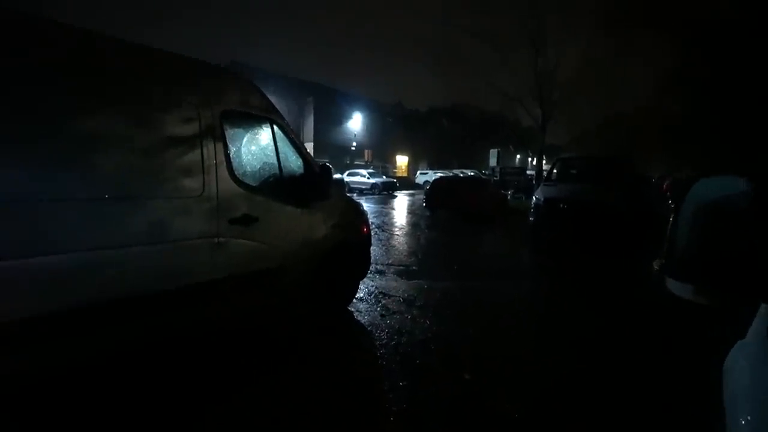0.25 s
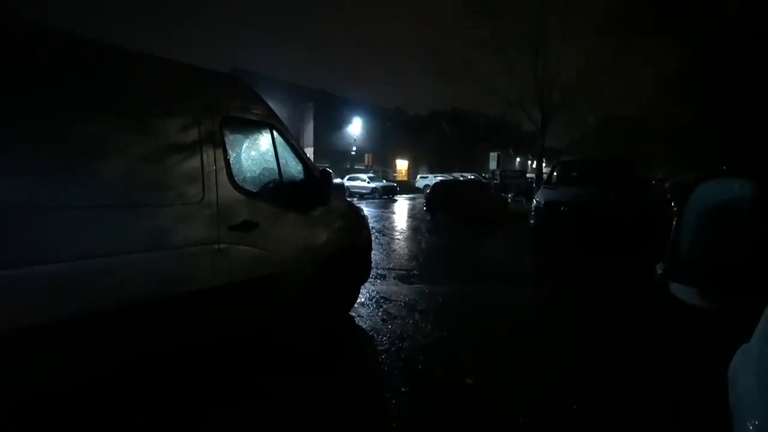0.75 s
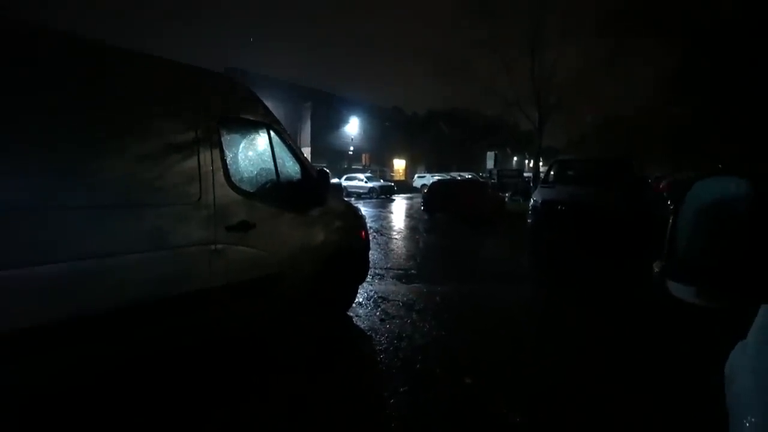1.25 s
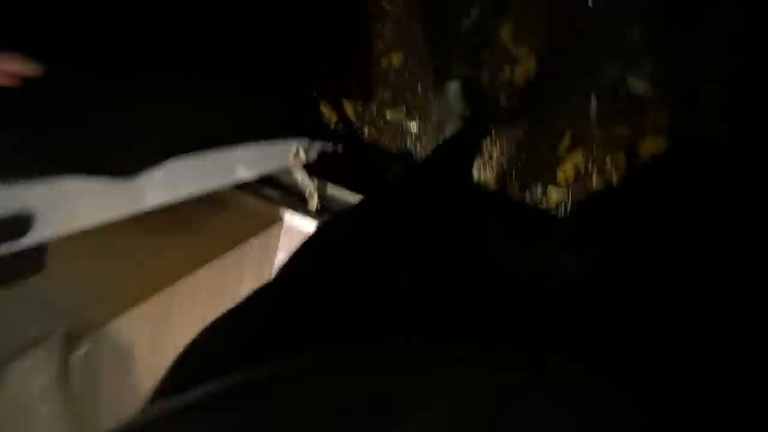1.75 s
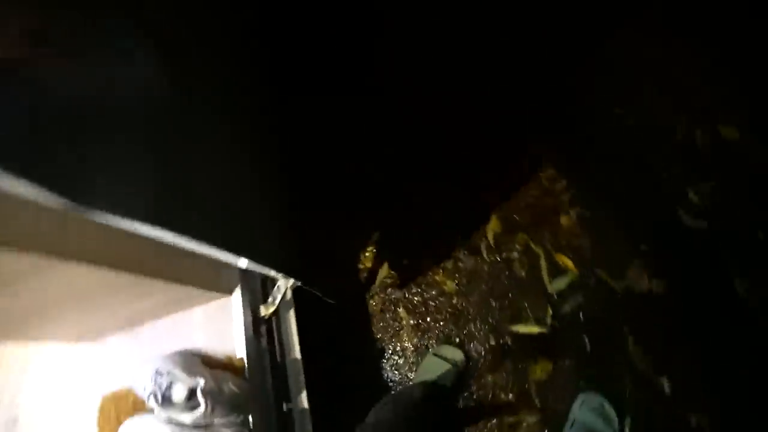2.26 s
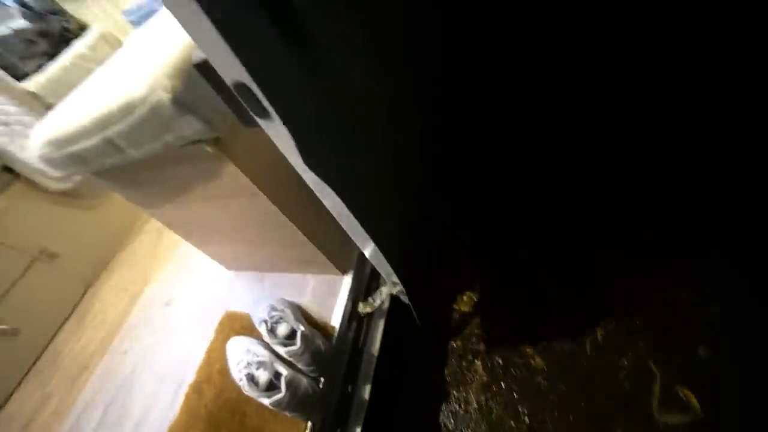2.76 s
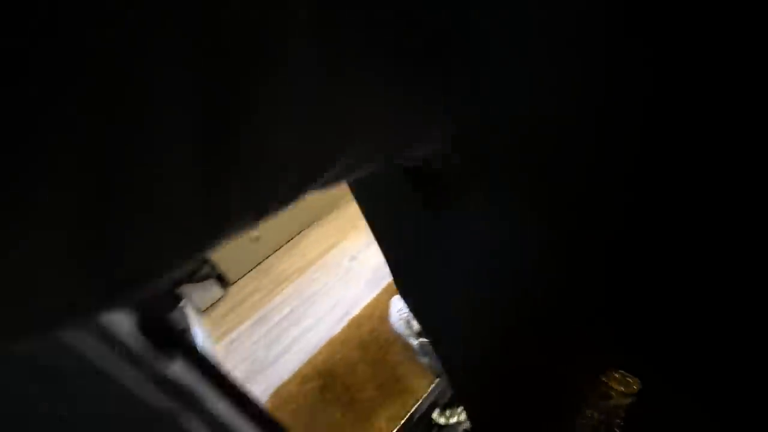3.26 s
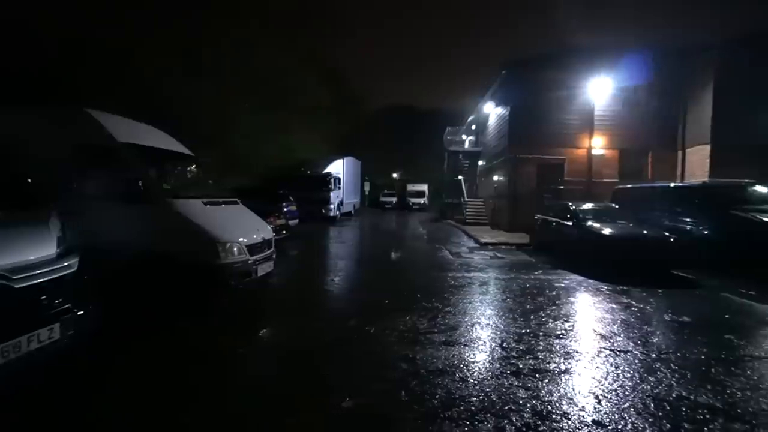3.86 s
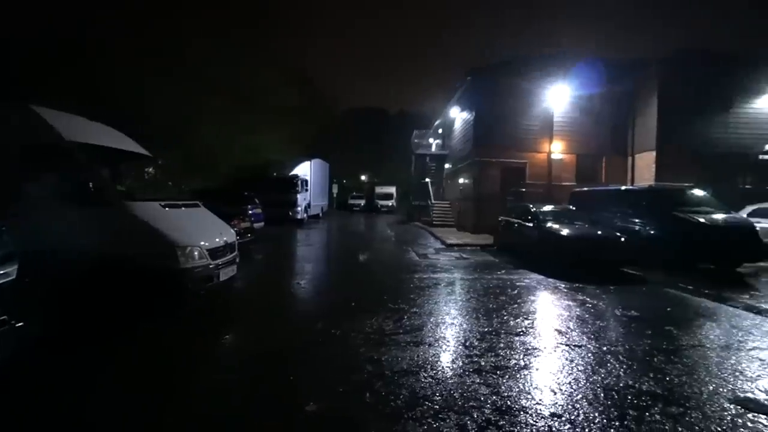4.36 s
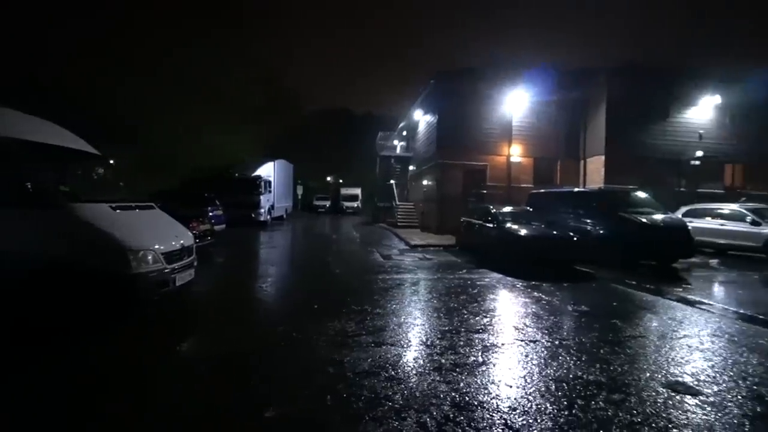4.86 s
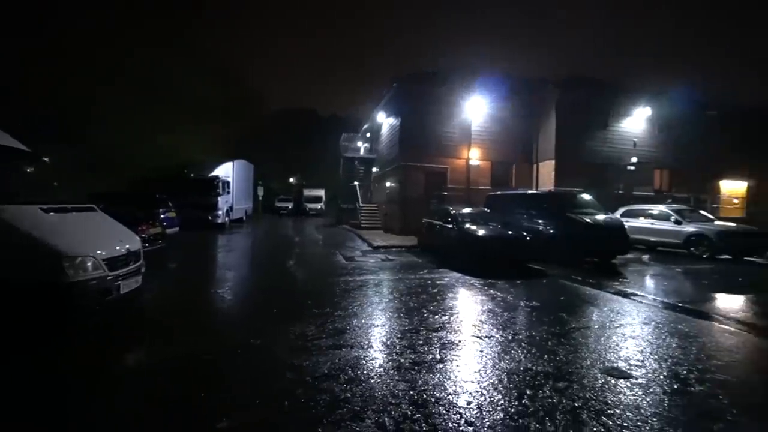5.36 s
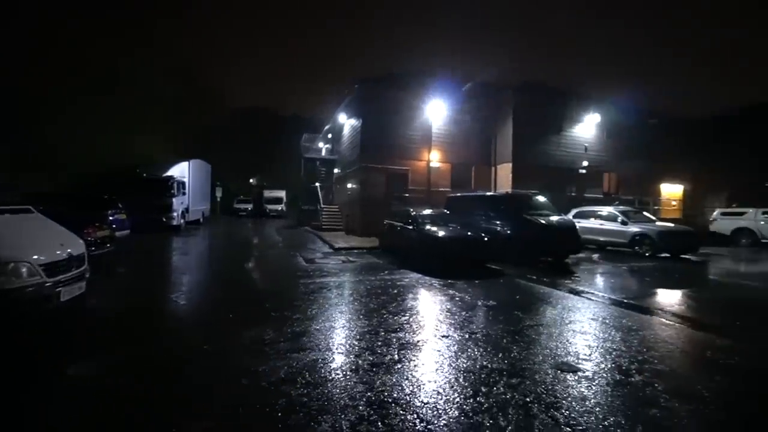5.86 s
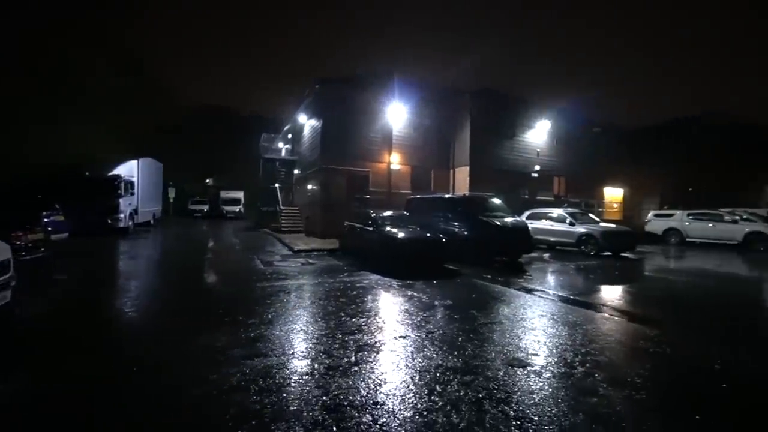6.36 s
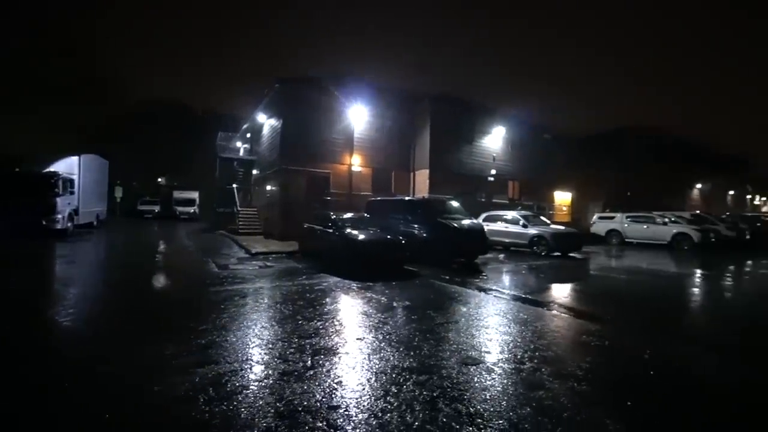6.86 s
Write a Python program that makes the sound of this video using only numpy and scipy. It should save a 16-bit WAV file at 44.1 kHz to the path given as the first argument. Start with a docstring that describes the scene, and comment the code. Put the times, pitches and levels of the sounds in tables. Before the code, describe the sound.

Steady rain in a car park, with sharp clacks, jacket rustle and a van's sliding door rolling shut with a boom.

```python
"""Heavy rain on a car park

Rain drums on parked vans and splashes on tarmac, heard from a hand-held camera. The sound fades out
briefly; someone steps down from a van, scuffs against it and rolls its sliding door shut.
Stray drops tick and thump on the camera; slow air pressure sways on the microphone."""
import sys
import numpy as np
from scipy import signal
from scipy.fft import rfft, irfft, next_fast_len
from scipy.io import wavfile
from scipy.ndimage import uniform_filter1d, map_coordinates

SR = 44100
rng = np.random.default_rng(int(sys.argv[2]) if len(sys.argv) > 2 else 0)


def waveform_to_disk(signal):
    """Save audio, clipped to [-1, 1], as 16-bit WAV at the path in sys.argv[1]."""
    frames = np.transpose(np.atleast_2d(signal))
    scaled = np.clip(frames, -1, 1) * 32767
    samples = np.round(scaled).astype(np.int16)
    wavfile.write(sys.argv[1], SR, samples)


N = 313992


def amp(db):
    """Decibels to gain."""
    return 10 ** (np.asarray(db) / 20)


def unit(x):
    """Scale to rms 1."""
    return x / np.sqrt(np.mean(x ** 2) + 1e-20)


def clock():
    """Seconds at each sample."""
    return np.arange(N) / SR


def envelope(shape, t):
    """Trapezoid, 0 to 1; shape is (start, attack, hold, release) in s."""
    return np.interp(t, np.cumsum(shape), [0, 1, 1, 0])


def wobble(rate):
    """A smooth random curve, rate knots a second."""
    return map_coordinates(rng.standard_normal(int(N * rate / SR) + 4), [clock() * rate])


def filtered(x, response):
    """x times a response of frequency."""
    m = next_fast_len(N + SR // 2)
    return irfft(rfft(x, m) * response(np.fft.rfftfreq(m, 1 / SR)), m)[:N]


def coloured(x, points):
    """x shaped by (Hz, dB) points on a log axis."""
    f, db = np.transpose(points)
    return filtered(x, lambda hz: amp(np.interp(np.log(hz + 1), np.log(f + 1), db)))


def noise(points):
    """Coloured noise of rms 1."""
    return unit(coloured(rng.standard_normal(N), points))


def patter(points, rate, spread_db):
    """Random tiny impacts, rate a second, of scattered sizes; rms 1."""
    sizes = amp(spread_db * rng.standard_normal(N)) * rng.standard_normal(N)
    return unit(coloured(sizes * (rng.random(N) < rate / SR), points))


def patchy(x, depth_db):
    """Let patches of the spectrum swell and sink."""
    z = signal.stft(x, nperseg=1024)[2]
    field = uniform_filter1d(rng.standard_normal(z.shape), size=6, axis=0)
    field = uniform_filter1d(field, size=8, axis=1)
    return unit(signal.istft(z * amp(depth_db * unit(field)), nperseg=1024)[1][:N])


def ring(modes, t):
    """Damped modes, struck at slightly new strengths."""
    scatter = rng.standard_normal(len(modes))
    return sum(amp(db + d) * np.exp(-np.log(1000) * t / t60) * np.sin(2 * np.pi * hz * t)
               for (hz, db, t60), d in zip(modes, scatter))


def add(track, s, sound):
    """Mix a sound in at time s."""
    start = max(round(s * SR), 0)
    track[start:start + len(sound)] += sound[:max(N - start, 0)]


def rain():
    """Dense drops drum on bodywork, splash on tarmac and throw up spray."""
    # impact spectra: f/Hz, level/dB
    bodywork_spectrum = [(40, 3), (100, -1), (220, -0.5), (400, -2.5), (700, -3), (1050, -3), (1600, -7),
                         (2600, -9.5), (6000, -51)]
    tarmac_spectrum = [(300, -29), (1000, -7.5), (1700, -2.5), (2400, -0.5), (3200, -.5), (4200, -6),
                       (5200, -10), (6500, -19), (9000, -35), (15000, -47)]
    spray_spectrum = [(2000, -40), (5000, -0.5), (7000, -1), (8000, 1), (10000, -8), (12500, -10.5),
                      (15500, -17)]
    # rain as heard; in the last row the gain slowly recovers after the slam:
    # start t/s, drumming/dB, splash/dB, spray/dB, level drift/(dB/s)
    stretches = [(0, -24.5, -24, -37, -0.78), (1.325, -32, -30.5, -47.5, -0.76),
                 (3.87, -33.5, -36.5, -53, 1.19)]
    t, rows = clock(), np.array(stretches)
    stretch = np.searchsorted(rows[1:, 0], t)
    start_s, drum_db, splash_db, spray_db, drift_db_per_s = rows[stretch].T
    near_van = stretch == 0
    swish_db = -7.5 * (t - 0.62) ** 2 * near_van  # swells, then sinks
    heard_level = amp(drift_db_per_s * (t - start_s) + 0.29 * wobble(5.5))
    drumming = patchy(patter(bodywork_spectrum, rate=14000, spread_db=2.5), depth_db=0.87)
    splash = patchy(patter(tarmac_spectrum, rate=30000, spread_db=1.5), depth_db=1.24)
    spray = patter(spray_spectrum, rate=32000, spread_db=3.5)
    hiss = amp(splash_db) * splash + amp(spray_db) * spray
    downpour = heard_level * (amp(drum_db) * drumming + amp(swish_db) * hiss)
    return np.where(near_van, beside_van(downpour), downpour)


def beside_van(x):
    """Rain near the van: a bright band, then a hollow-sounding one that sinks as the camera turns."""
    # colour near the van: f/Hz, gain/dB
    van_colour = [(60, 5.5), (150, -0.5), (380, -0.5), (600, -1), (1000, -1.5), (1400, -1.5), (1900, -0.5),
                  (2600, 0), (3400, 0.5), (5500, 2.2), (8000, 0), (15000, -1.5)]
    hz, t, z = signal.stft(coloured(x, van_colour), SR, nperseg=1024)

    def band(centre_hz, width_oct):
        return np.exp(-(np.log2((hz[:, None] + 1) / centre_hz) / width_oct) ** 2)

    hollow_hz = 1250 * 2 ** (-0.58 * t)
    hollow_db = 6.5 * envelope((0.1, 0.77, 0.17, 0.41), t) * band(hollow_hz, width_oct=0.56)
    bright_db = 2 * envelope((0, 0.15, 0.3, 0.22), t) * band(3250, width_oct=0.3)
    return signal.istft(z * amp(hollow_db + bright_db), SR, nperseg=1024)[1][:N]


def door():
    """Rollers rumble louder with speed; the door brakes, booms on its frame, shudders into the seal."""
    # roller and body spectra: f/Hz, level/dB
    roller_spectrum = [(60, -32), (130, -2), (200, 2.5), (290, -2), (410, -2.5), (650, -13), (1200, -21),
                       (2500, -28), (5000, -43), (12000, -76)]
    shudder_spectrum = [(15, -18), (38, 4.5), (70, 4), (130, -2.5), (200, -11.5), (500, -70)]
    # hits on the frame: t/s, level/dB
    slams = [(3.576, -7), (3.607, -13), (3.65, -14.5), (3.724, -17)]
    # door panel modes: f/Hz, level/dB, t60/s
    panel_modes = [(66, -12, 0.23), (118, -7, 0.12), (203, -20, 0.16), (340, -2.5, 0.041), (480, 6, 0.04),
                   (593, -3, 0.094), (677, -8, 0.12), (948, -6.5, 0.053), (1115, -10, 0.043)]
    pull_s, latch_s, rest_s, stop_s, brake_db_per_s = 2.763, 3.498, 3.88, 0.04, 60
    t = clock()
    speed = np.clip((t - pull_s) / (latch_s - pull_s), 0, 1)
    braking = amp(-brake_db_per_s * np.maximum(t - latch_s, 0))
    drive = speed ** 0.89 * braking * np.clip((rest_s - t) / stop_s, 0, 1)
    roll_db = -14.8 + 1.6 * wobble(22)  # rollers run unevenly
    rumble = patchy(patter(roller_spectrum, rate=9000, spread_db=2), depth_db=1.5)
    seating = amp(-15) * envelope((3.52, 0.099, 0.16, 0.091), t)
    shudder = (amp(-30) * drive + seating) * noise(shudder_spectrum)
    sound = amp(roll_db) * drive * rumble + shudder
    age_s = np.arange(SR // 3) / SR
    for s, db in slams:
        add(sound, s, amp(db) * ring(panel_modes, age_s))
    return sound


def knocks(crack_decay_s=0.0022):
    """Step, handle, runners and latch: each hard contact cracks and rings briefly."""
    # contacts: t/s, crack/dB, ring/dB, ring f/Hz
    contacts = [(1.777, -25, -17, 3660), (1.866, -3.5, -1.5, 636), (1.915, -22, -13, 2970),
                (1.978, -10.5, -10, 2430), (2.035, -16, -11, 1850), (2.824, -22, -11.5, 2380),
                (2.877, -33, -8.5, 1140), (2.978, -31, -10.5, 1130), (3.001, -3.5, -1, 1310),
                (3.251, -13, -11, 2820), (3.575, -6.5, -13, 3180), (3.644, -14, -16, 1930),
                (3.725, -17, -7, 690)]
    # modes of small steel parts: ratio to ring f, level/dB, t60/s
    steel_modes = [(.8, -18, .008), (1, 1.5, .012), (1.3, -25, 0.01), (1.85, -18, .007)]
    # crack colour: f/Hz, gain/dB
    crack_colour = [(150, -22), (900, 7), (2500, 4.5), (4500, 0.5), (6500, -10), (9500, -20), (12800, -14),
                    (15500, -28)]
    cracks, rings = np.zeros(N), np.zeros(N)
    t = np.arange(SR // 10) / SR
    for s, crack_db, ring_db, hz in contacts:
        add(cracks, s, amp(crack_db) * rng.standard_normal(len(t)) * np.exp(-t / crack_decay_s))
        modes = [(hz * ratio, db, t60) for ratio, db, t60 in steel_modes]
        add(rings, s, amp(ring_db) * ring(modes, t))
    return rings + coloured(cracks, crack_colour)


def scuffs():
    """Sleeve and sole rub in short gritty strokes; heavier ones have a low body."""
    # strokes: peak t/s, level/dB, rise/s, fall/s, body re grit/dB
    strokes = [(1.451, -23.5, .004, 0.0049, -10), (1.778, -24, .007, 0.0054, -20),
               (1.836, -20, .0012, .006, -4), (1.857, -16.5, 0.0064, .0055, -2.5),
               (1.869, -13, .0019, 0.0014, 5), (1.878, -41, .005, 0.028, 18),
               (1.919, -14.5, 0.0058, .007, -6), (1.934, -16.5, .004, 0.013, -20),
               (1.967, -18, 0.00089, .0034, -22), (1.979, -17, .0022, 0.0034, -10),
               (2.041, -28, 0.0015, 0.02, 0), (3.55, -33, .008, .005, 12.5),
               (3.611, -32, 0.0035, 0.0083, 15), (3.69, -40, 0.009, 0.024, 20),
               (3.762, -36, .004, 0.028, 11), (3.85, -38.5, 0.032, .008, 7)]
    # friction spectra: f/Hz, level/dB
    grit_spectrum = [(300, -20), (1000, -7.5), (1800, -0.5), (3200, 1), (5000, -6.5), (7000, -14),
                     (11000, -19), (15500, -27)]
    body_spectrum = [(100, -24), (220, -19), (380, -2), (600, 1), (1100, -0.5), (2000, -9), (3500, -17.5),
                     (7000, -55)]
    grit, body = np.zeros(N), np.zeros(N)
    for s, db, rise_s, fall_s, body_db in strokes:
        t = clock() - s
        stroke = amp(db) * np.exp(-np.maximum(-t / rise_s, t / fall_s))
        grit += stroke
        body += amp(body_db) * stroke
    return grit * patter(grit_spectrum, rate=4100, spread_db=-0.5) + body * noise(body_spectrum)


def camera_drops(impact_decay_s=0.0005, spray_decay_s=0.0057, spray_db=-19):
    """Drops on the case push one soft pressure wave each; splashes beside the port tick."""
    # drops on the case: t/s, peak/dB, f/Hz
    case_hits = [(.311, -4.5, 114), (1.132, -8.5, 210), (2.229, -19.5, 125), (2.47, -21.5, 120),
                 (4.316, -13.5, 137), (4.332, -18.5, 230), (5.0395, -10.5, 199), (6.169, -18, 187),
                 (6.217, -10.5, 87)]
    # close splashes: t/s, level/dB
    splashes = [(1.4301, -24), (1.6965, -24), (1.8367, -13), (2.0997, -19), (2.2693, -16.5), (2.4708, -21),
                (2.583, -24), (2.9272, -27), (3.1074, -32), (3.2174, -26), (3.2924, -28), (3.8586, -23),
                (4.339, -33), (5.0304, -34), (5.439, -28), (5.8331, -29), (6.6827, -23), (6.7164, -23),
                (7.0474, -30)]
    # splash colour: f/Hz, gain/dB
    tick_colour = [(800, -25), (2500, -6), (6000, 5), (9000, -1.5), (12500, -2.5), (15500, -7)]
    thumps, ticks = np.zeros(N), np.zeros(N)
    for s, db, hz in case_hits:
        phase = np.clip(2 * np.pi * hz * (clock() - s), -20, 20)
        thumps -= amp(db) * phase * np.exp((1 - phase ** 2) / 2)
    t = np.arange(SR // 50) / SR
    decay = np.exp(-t / impact_decay_s) + amp(spray_db) * np.exp(-t / spray_decay_s)
    for s, db in splashes:
        add(ticks, s, amp(db) * rng.standard_normal(len(t)) * decay)
    return thumps + coloured(ticks, tick_colour)


def drips(count=2200, low_hz=1000, high_hz=7000, open_db=-51.5, roof_edge_db=-36.5):
    """Near drops splat for a cycle or two; louder under the van's dripping roof edge."""
    when, pitch, life, size = rng.random((count, 4)).T[:, :, None]
    hz = low_hz * (high_hz / low_hz) ** pitch
    t = np.arange(SR // 100) / SR
    cycles = hz * t
    decay_cycles = 0.6 + 1.7 * life ** 2
    splats = amp(10 * size ** 2) * np.sin(2 * np.pi * cycles) * np.exp(-cycles / decay_cycles)
    samples = (when * N).astype(int) + np.arange(len(t))
    nearness = amp(open_db) + amp(roof_edge_db) * envelope((1.33, 0.82, 1.6, 0.11), clock())
    return nearness * unit(np.bincount(samples.ravel(), splats.ravel(), N)[:N])


def plinks(t60_s=0.022):
    """Big drops ring briefly in puddles."""
    # puddle drops: t/s, level/dB, f/Hz
    puddle_drops = [(5.6236, -20, 2390), (6.6824, -24, 2030), (6.7154, -22, 2550)]
    sound, t = np.zeros(N), np.arange(SR // 10) / SR
    for s, db, hz in puddle_drops:
        add(sound, s, ring([(hz, db, t60_s)], t))
    return sound


def jacket(level_db=-50.5, clump_db=5):
    """Creases of a moving wet jacket snap in small clumps of varying colour."""
    # snap spectrum: f/Hz, level/dB
    snap_spectrum = [(1000, -25), (3000, 0), (5500, 8), (8000, 4), (10000, -9), (12500, -7), (15500, -13)]
    clumps = amp(clump_db * wobble(45))
    snaps = patchy(patter(snap_spectrum, rate=450, spread_db=1.0), depth_db=3.5)
    return amp(level_db) * envelope((1.38, 0.05, 2.42, 0.047), clock()) * unit(clumps * snaps)


def sway(limit=0.7):
    """Moving air and the moving camera press slowly on the microphone."""
    # pressure spectrum: f/Hz, level/dB
    pressure_spectrum = [(2, -6.5), (8, -5), (13, 3.5), (22, -0.5), (32, -15.5), (50, -25), (90, -32.5),
                         (200, -53), (600, -100)]
    t = clock()
    swell = noise(pressure_spectrum)
    local_power = np.abs(uniform_filter1d(swell ** 2, size=SR // 6))
    even_swell = swell / np.sqrt(local_power + 0.055)
    carrying = amp(-13.5) * envelope((1.24, 0.088, 1.73, 0.63), t)
    step_lurch = amp(-4) * envelope((1.414, 0.07, 0.06, 0.27), t)
    recovery_db = -5.5 * envelope((3.72, 0.15, 0.81, 1.2), t)  # gain dips after the slam, then returns
    pressure = np.hypot(amp(-21 + recovery_db), carrying + step_lurch) * even_swell
    return limit * np.tanh(pressure / limit)


def scene():
    """All sources at one microphone."""
    water = rain() + drips() + plinks() + camera_drops()
    return (water + scuffs() + jacket() + knocks() + door() + sway())[None]


def record(dry):
    """Brief fade out and in, soft clipping, band limit."""
    dip_s, dip_db, fade_out_s, fade_in_s = 1.325, -52, 0.095, 0.12
    ceiling, top_hz = 0.75, 15950
    t = clock() - dip_s
    faded = dry[0] * np.tanh(amp(dip_db) + np.maximum(-t / fade_out_s, t / fade_in_s))
    clipped = faded / (1 + np.abs(faded / ceiling) ** 8) ** (1 / 8)
    return filtered(clipped, lambda hz: hz < top_hz)[None]


dry = scene()
out = record(dry)
waveform_to_disk(out)
```